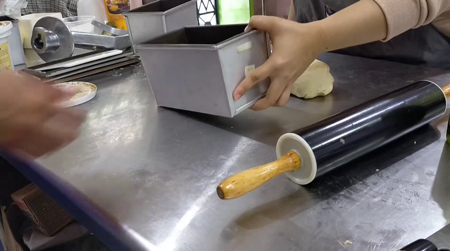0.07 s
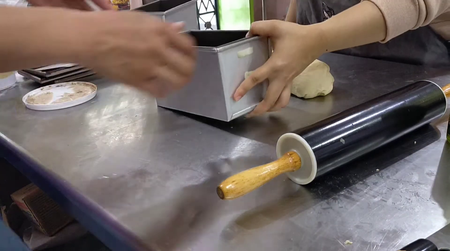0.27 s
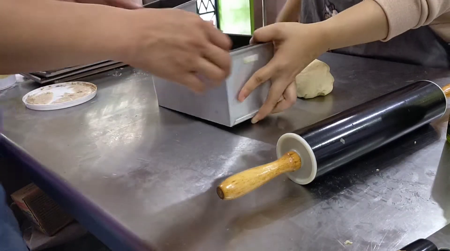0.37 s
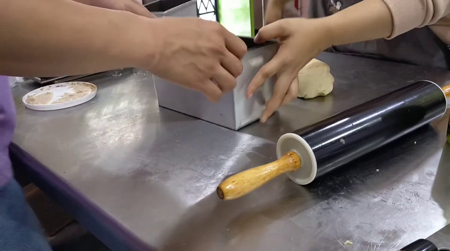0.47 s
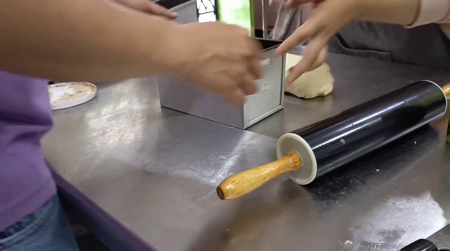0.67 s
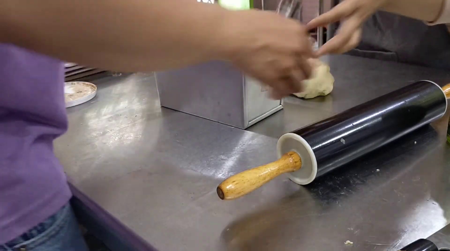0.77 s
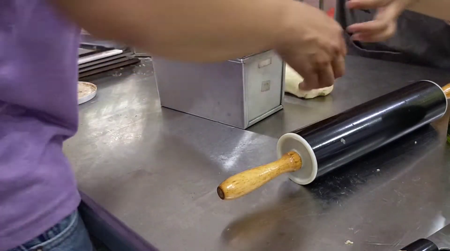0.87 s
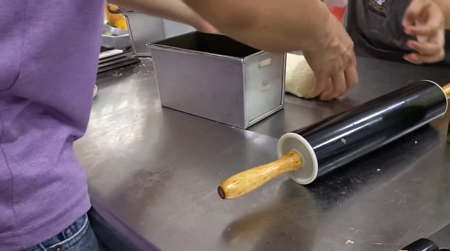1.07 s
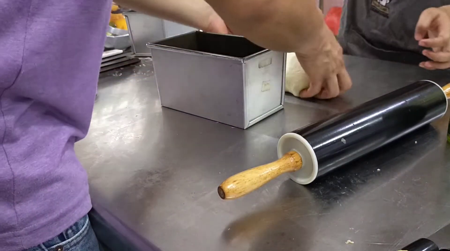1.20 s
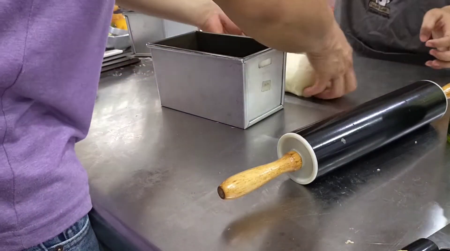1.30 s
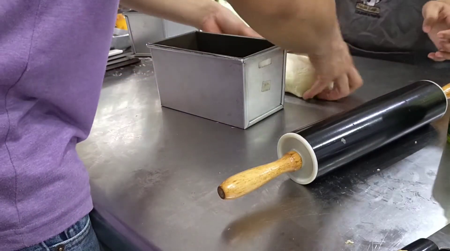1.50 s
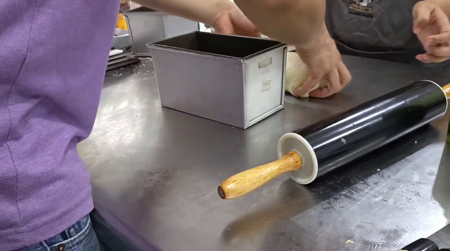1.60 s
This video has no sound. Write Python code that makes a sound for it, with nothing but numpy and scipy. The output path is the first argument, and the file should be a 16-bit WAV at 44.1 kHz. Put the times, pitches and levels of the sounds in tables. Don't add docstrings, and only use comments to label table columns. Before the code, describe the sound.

An empty metal loaf tin knocks a steel worktable: two short edge taps, a tiny rebound, then a louder flat landing with rim rattle and a faint scrape. Machine hum continues in a hard-walled kitchen, heard close.

```python
import sys
import numpy as np
from scipy import signal
from scipy.fft import rfft, irfft, next_fast_len
from scipy.io import wavfile
from scipy.ndimage import uniform_filter1d, map_coordinates

SR = 44100
rng = np.random.default_rng(int(sys.argv[2]) if len(sys.argv) > 2 else 0)


def how_loud(loudness_db):
    steps = np.asarray(loudness_db, float) / 20
    return 10 ** steps


def store_wav(level_fs):
    pcm = np.round(np.clip(np.atleast_2d(level_fs), -1, 1) * 32767)
    wavfile.write(sys.argv[1], SR, pcm.T.astype(np.int16))


N = 72765

# pitch_hz, density_db (per Hz)
HISS_SPECTRUM = [(45, -30.5), (90, 0), (230, -4), (460, -9.5), (900, -9), (2700, -14), (5000, -23),
                 (16000, -33.5)]
# time_s, level_db
HISS_DRIFT = [(0, -3.5), (.5, -0.4), (1.1, 1.5), (1.65, -1.3)]
# centre_hz, width_hz, level_db
HUM_BANDS = [(33, 5, -51), (65, 5, -55), (48, 10, -58)]

TICK_START = [
    .1551,
    .1550,
    .163,
    .365,
    .3685,
    .554,
]
# level_db, centre_hz, t60_s
TICK_SOUND = [(-21, 1200, .005), (-35.5, 16000, 0.028), (-29, 6600, 0.034), (-39, 8200, 0.034),
              (-33, 14000, 0.017), (-30, 44000, .03)]
# start_s, level_db, centre_hz, t60_s
RIM_SLAPS = [(.0572, -39, 2100, .014), (.081, -46, 2400, .02), (.0895, -46, 2600, .015),
             (.509, -44, 1100, .04), (.513, -47, 8000, .04), (.5596, -15, 12500, .011),
             (.5632, -25, 14000, .008), (.5683, -26, 10500, .008), (.581, -31, 12000, .008),
             (.5945, -30, 12000, .008), (1.119, -57, 15000, .01)]

BLOW_START = [
    0.1548,
    0.3676,
    0.404,
    0.5527,
    0.5585,
]
# ring_db, clang_db, clang_t60_s, rise_cycles (growth of each mode, in units of 1/pitch)
BLOW_SOUND = [(-28, -30, 0.14, 3.4), (-29.5, -31.5, 0.15, 2.2), (-36, -47, 0.135, 2.1),
              (-18.5, -27, 0.065, 1.03), (-29.5, -24, 0.22, 0.37)]
# pitch_hz; then level_db, t60_s
EDGE_A_PITCH = [200, 524, 561, 764, 940, 1145, 1359, 1593, 1717, 1863, 2412, 4199, 4770]
EDGE_A_MODES = [(-9.5, 0.18), (-1.5, 0.19), (8.5, 0.087), (-11.5, 0.11), (-2.5, 0.084), (-5, 0.2),
                (-16, 0.073), (0, 0.071), (-12, 0.23), (-15, 0.28), (-12, 0.15), (-18, 0.17), (-11, 0.089)]
# pitch_hz; then level_db, t60_s
EDGE_B_PITCH = [200, 524, 550, 600, 660, 980, 1143, 1224, 1384, 1604, 1863, 2186, 2417, 3079]
EDGE_B_MODES = [(-10, 0.24), (-8.5, 0.45), (-2.5, 0.11), (13.5, 0.035), (-24, .07), (-4, 0.1), (-7.5, 0.26),
                (-7, 0.13), (-5, 0.081), (-8, .16), (-11.5, 0.16), (-15, 0.23), (-39, .16), (-21.5, 0.45)]
# pitch_hz; then level_db, t60_s
FLAT_PITCH = [60, 310, 420, 528, 520, 639, 970, 1069, 1200, 1443, 1530, 2250, 2541, 2780]
FLAT_MODES = [(-12, 0.059), (-17, 0.17), (-6, 0.14), (9, 0.04), (-15, 0.84), (-10, 0.22), (-7, 0.066),
              (-15, 0.2), (-9.5, 0.093), (-6, 0.091), (-5.5, 0.1), (-15, 0.071), (-20.5, .1),
              (-16.5, 0.043)]
# pitch_hz, density_db (per Hz)
TAP_CLANG = [(200, -9), (500, 1), (1500, 4.5), (2600, -1), (4000, -2), (7000, -4.5), (11000, -11.5),
             (16000, -17)]
LAND_CLANG = [(200, -6), (500, 1), (1500, -3), (2600, -4.5), (4000, -5), (7000, -4.5), (11000, -13.5),
              (16000, -13.5)]
# pitch_hz, t60_share (of the blow's clang_t60_s)
CLANG_LIFE = [(300, 3.1), (1500, 1.81), (5000, 0.7), (15000, 1.68)]

# pitch_hz, t60_s
KITCHEN_DECAY = [(200, 1), (600, 0.27), (2500, .8), (8000, 0.78), (15000, 0.64)]
# time_s, level_db
SLIDE_LEVEL = [(.58, -100), (.65, -42.5), (.76, -44.5), (.86, -51), (1.0, -58.5)]
# pitch_hz, density_db (per Hz)
SLIDE_SPECTRUM = [(200, 3), (450, 4.5), (2500, -1), (4000, 0.5), (6000, -4.5), (8200, -3), (11000, -8.5),
                  (16000, -28)]
# time_s, level_db
SQUEAL_LEVEL = [(.96, -92), (1.0, -64), (1.05, -46.5), (1.12, -51.5), (1.18, -60.5), (1.25, -74),
                (1.36, -76), (1.41, -91)]
# start_s, length_s, low_hz, high_hz
TREBLE_SPREAD = [(.15, .01, 4500, 14000), (.36, .012, 4500, 15500), (.385, .045, 9500, 14500),
                 (.385, .05, 5000, 7000), (.505, .025, 4800, 15500), (.548, .01, 4500, 14000),
                 (.565, .05, 4200, 5300), (.565, .05, 6300, 7100), (.565, .05, 8300, 9200),
                 (.565, .05, 10200, 11200)]
# centre_hz, width_hz, gain_db
MIC_COLOUR = [(2470, 310, 2.5), (6070, 1900, -3.5), (8060, 500, 3), (11000, 2150, -3), (15300, 1800, 6.5)]


def unit(x):
    return x / np.sqrt(np.mean(x ** 2) + 1e-20)


def along(points, hz):
    f, v = np.transpose(points)
    return np.interp(np.log(hz + 1), np.log(f + 1), v)


def curve(rows):
    return np.interp(np.arange(N) / SR, *np.transpose(rows))


def wobble(rate):
    knots = rng.standard_normal(int(N * rate / SR) + 4)
    return map_coordinates(knots, [np.arange(N) * rate / SR])


def filtered(x, response):
    m = next_fast_len(x.shape[-1] + 8192)
    spectrum = rfft(x, m) * response(np.fft.rfftfreq(m, 1 / SR))
    return irfft(spectrum, m)[..., :x.shape[-1]]


def resonance(centre_hz, width_hz):
    return lambda f: 1 / (1 + ((f - centre_hz) / width_hz) ** 2)


def dying(t60_of):
    hz, t, z = signal.stft(rng.standard_normal(SR), SR, nperseg=128)
    decay = how_loud(-60 * t / t60_of(hz)[:, None])
    return signal.istft(z * decay, SR, nperseg=128)[1][:SR]


def add(track, s, sound):
    part = track[round(s * SR):][:len(sound)]
    part += sound[:len(part)]


def machines():
    z = signal.stft(rng.standard_normal(N), nperseg=512)[2]
    field = uniform_filter1d(rng.standard_normal(z.shape), size=6, axis=0)
    field = uniform_filter1d(field, size=12, axis=1)
    patchy = signal.istft(z * how_loud(1.2 * unit(field)), nperseg=512)[1][:N]
    hiss = unit(filtered(patchy, lambda f: how_loud(along(HISS_SPECTRUM, f)) * (f > 30)))
    hum = np.zeros(N)
    for centre_hz, width_hz, db in HUM_BANDS:
        hum += how_loud(db) * unit(filtered(rng.standard_normal(N), resonance(centre_hz, width_hz)))
    hiss_db = -49.5 + curve(HISS_DRIFT) + 0.13 * wobble(8.3)
    return how_loud(hiss_db) * hiss + hum


def ticks():
    width_octaves, rise_s = 1.27, 0.00025
    out, t = np.zeros(N), np.arange(SR // 10) / SR
    contacts = [(s, *row) for s, row in zip(TICK_START, TICK_SOUND)] + RIM_SLAPS
    for s, db, hz, t60 in contacts:
        noise = rng.standard_normal(len(t))
        grit = filtered(noise, lambda f: np.exp(-(np.log2((f + 1) / hz) / width_octaves) ** 2))
        add(out, s, how_loud(db - 60 * t / t60) * unit(grit) * (1 - np.exp(-t / rise_s)))
    return out


def panel_ring(t, pitches, modes, rise_cycles):
    rattle_db, rattle_rad_per_khz = 1.3, 0.25
    ring = np.zeros(len(t))
    for hz, (db, t60) in zip(pitches, modes):
        level_waver = rattle_db * np.minimum(t / 0.042, 1) * wobble(36)[:SR]
        phase_waver = rattle_rad_per_khz * hz / 1000 * np.minimum(t / 0.0077, 1) * wobble(40.6)[:SR]
        rise = 1 - np.exp(-t * hz / rise_cycles)
        ring -= how_loud(db - 60 * t / t60 + level_waver) * rise * np.sin(2 * np.pi * hz * t + phase_waver)
    return ring


def tin():
    grip_s, grip_fade_s = 0.76, 0.015
    t, knocks = np.arange(SR) / SR, []
    edge_a = (EDGE_A_PITCH, EDGE_A_MODES, TAP_CLANG)
    edge_b = (EDGE_B_PITCH, EDGE_B_MODES, TAP_CLANG)
    flat = (FLAT_PITCH, FLAT_MODES, LAND_CLANG)
    bodies = [edge_a, edge_b, edge_b, flat, flat]
    for s, blow, (pitches, modes, colour) in zip(BLOW_START, BLOW_SOUND, bodies):
        ring_db, clang_db, clang_t60, rise_cycles = blow
        ring = panel_ring(t, pitches, modes, rise_cycles)
        grip = np.exp(-np.maximum(s + t - grip_s, 0) / grip_fade_s)
        clang = dying(lambda hz: clang_t60 * along(CLANG_LIFE, hz))
        clang = filtered(clang, lambda hz: how_loud(along(colour, hz))) * (1 - np.exp(-t / 0.0004))
        knock = np.zeros(N)
        add(knock, s, how_loud(ring_db) * ring * grip + how_loud(clang_db + 5) * clang)
        knocks.append(knock)
    return knocks


def kitchen(x):
    level_db, delay_s = -9, 0.008
    tail = dying(lambda hz: along(KITCHEN_DECAY, hz))
    delayed = np.pad(x, (round(delay_s * SR), 0))
    return how_loud(level_db) * signal.fftconvolve(delayed, tail / np.linalg.norm(tail))[:N]


def slide():
    grit = rng.standard_normal(N) * how_loud(0.83 * wobble(150))
    scrape = unit(filtered(grit, lambda f: how_loud(along(SLIDE_SPECTRUM, f))))
    moving = np.arange(N) < SLIDE_LEVEL[-1][0] * SR
    return how_loud(curve(SLIDE_LEVEL)) * moving * scrape


def squeal():
    tone = filtered(rng.standard_normal(N), resonance(10445, 40))
    return how_loud(curve(SQUEAL_LEVEL)) * unit(tone)


def treble_difference(mid):
    t, scrambled = np.arange(N) / SR, mid * np.sign(wobble(300))
    side = np.zeros(N)
    for s, length, low, high in TREBLE_SPREAD:
        moment = scrambled * (t > s) * (t < s + length)
        side += filtered(moment, lambda f: (f > low) & (f < high))
    return how_loud(-13) * side


def scene():
    contacts = tin() + [ticks()]
    mid = sum(contact + kitchen(contact) for contact in contacts)
    mid = mid + slide() + squeal() + machines()
    side = treble_difference(mid)
    return np.array([mid + side, mid - side])


def low_pass(x):
    return signal.sosfilt(signal.butter(12, 16960, fs=SR, output="sos"), x)


def record(dry):
    top_hz, edge_hz = 15850, 150

    def microphone(f):
        gain_db = sum(db * np.exp(-((f - centre) / width) ** 2) for centre, width, db in MIC_COLOUR)
        return how_loud(gain_db) * np.clip((top_hz - f) / edge_hz + 0.5, 0, 1)

    return low_pass(filtered(dry, microphone))


dry = scene()
out = record(dry)
store_wav(out)
```